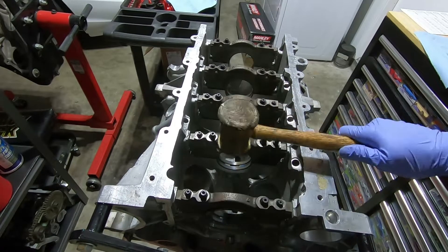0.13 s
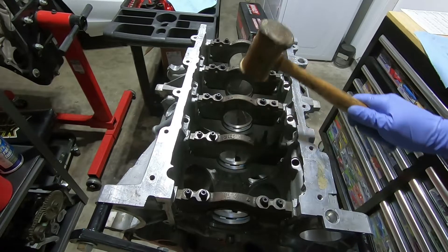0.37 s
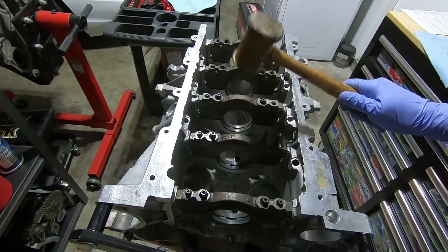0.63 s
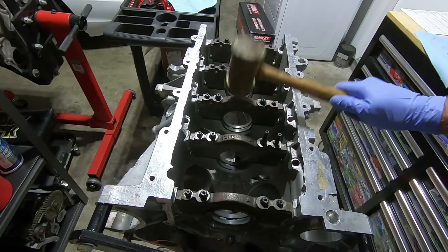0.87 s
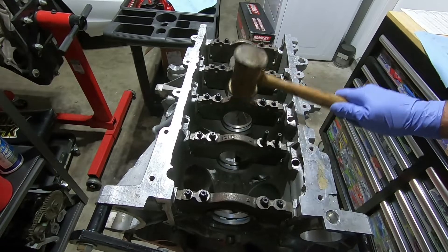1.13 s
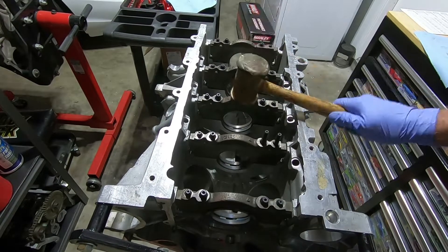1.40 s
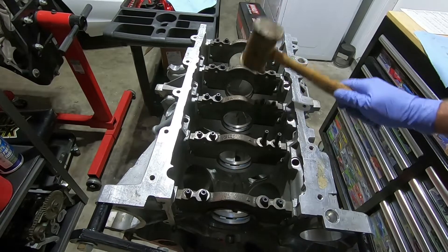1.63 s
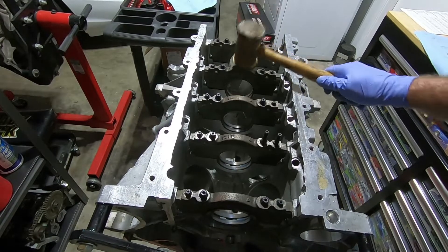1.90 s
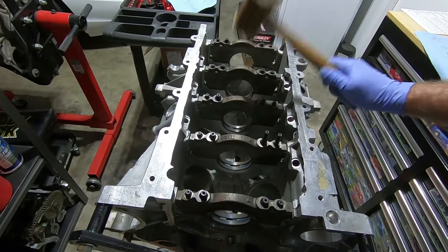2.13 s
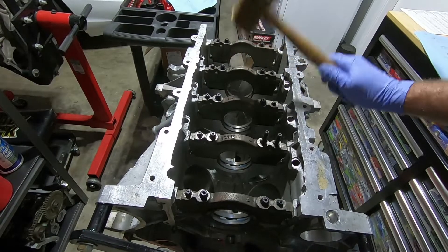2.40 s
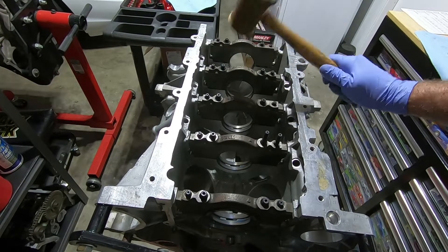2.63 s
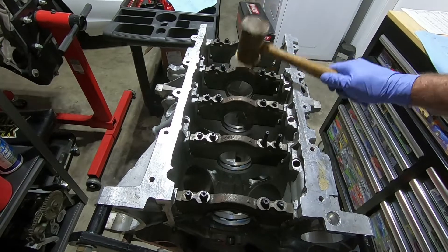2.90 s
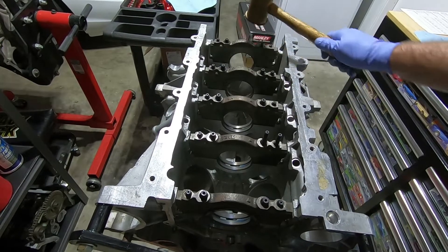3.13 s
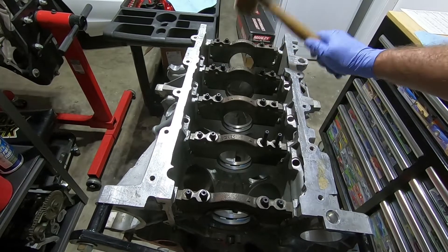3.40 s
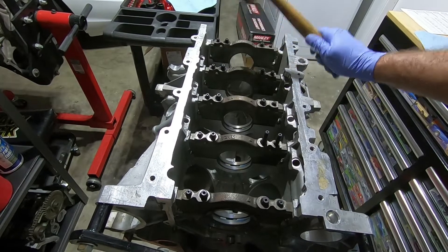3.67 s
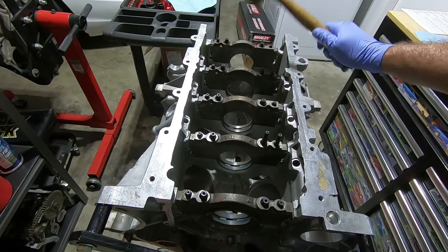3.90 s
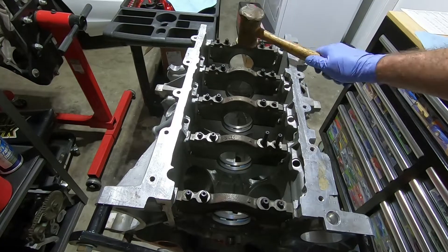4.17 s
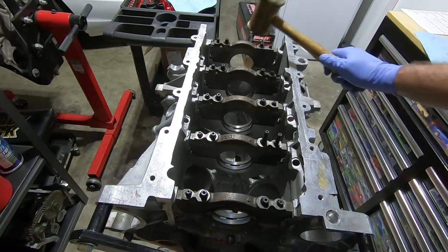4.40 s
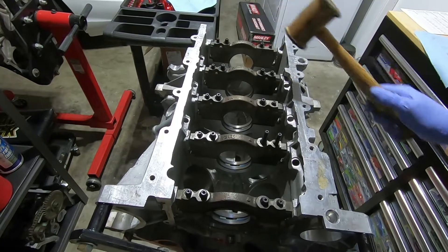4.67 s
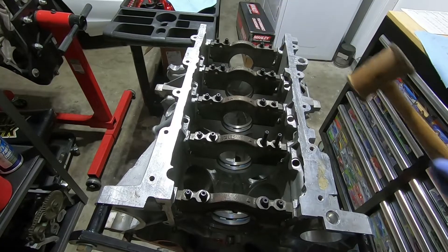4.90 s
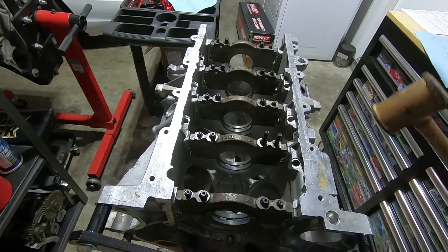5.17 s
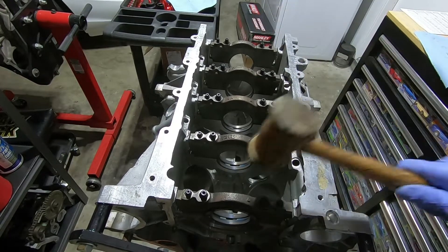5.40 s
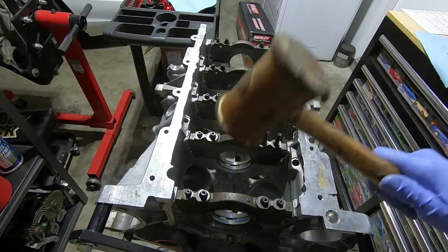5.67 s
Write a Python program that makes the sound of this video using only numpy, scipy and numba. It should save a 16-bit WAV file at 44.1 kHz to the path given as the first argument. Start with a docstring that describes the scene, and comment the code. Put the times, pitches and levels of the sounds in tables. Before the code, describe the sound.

A stereo close-up in a workshop with short, hard reflections. A mallet blow's fading tail opens it, and another knock lands at 0.1 seconds with a light rebound. Three evenly spaced blows follow at 0.8, 1.1 and 1.4, the first clangier, the last with small bounces. In the pause, two very faint thin squeaks glide near 1.8 and 1.9. Another set strikes at 2.2, 2.5 and 2.8, higher in ring, growing louder to a bright, strong clank with a rebound. A last set falls at 3.5, 3.8 and 4.1, starting softer and ending brighter. Each hit is a dry woody knock with gritty metal rattle, brief iron ring and low mount shudder, its tail squeezed by limiting. From about 4.8 only low room hum, soft cloth and shoe rustling and tiny ticks remain, the brightest rub near 5.4, a clearer click near 5.6.

```python
"""A wooden mallet taps bearing caps onto an iron block in a workshop, close to a camera with a limiter.
Each blow sums an air pulse (knock), decaying noise (clatter) and damped modes (ring of the block);
low modes shake the camera mount, and a decaying noise tail convolves blow and ring into the walls' answer.
Clothes and shoes rustle as patchy noise, small contacts tick as short damped tones, two thin tones glide,
and a low room hum of shaped noise lies under everything."""
import sys
import numpy as np
from scipy import signal
from scipy.fft import rfft, irfft, next_fast_len
from scipy.io import wavfile
from scipy.ndimage import uniform_filter1d
from numba import njit

SR = 44100
rng = np.random.default_rng(int(sys.argv[2]) if len(sys.argv) > 2 else 0)


def int16_out(signal):
    """Quantize to a 16-bit WAV file."""
    q = np.round(np.clip(np.atleast_2d(signal).T, -1, 1) * 32767)
    wavfile.write(sys.argv[1], SR, q.astype(np.int16))


def volts_from_db(level):
    """Convert decibel levels to linear amplitude ratios."""
    exponent = np.asarray(level, float) / 20
    return 10 ** exponent


N = 255339  # length in samples
TOUCH_S = 0.0017  # the face pushes the air ahead for this long, then stops hard


def unit(x):
    """Normalisation: scales a signal to an rms of 1."""
    return x / np.sqrt(np.mean(x ** 2) + 1e-20)


def along(points, hz):
    """Logarithmic frequency scale: interpolates (Hz, value) points on a log axis."""
    f, v = np.transpose(points)
    return np.interp(np.log(hz + 1), np.log(f + 1), v)


def filtered(x, response):
    """Linear filtering: multiplies the spectrum of x by a response of frequency."""
    m = next_fast_len(x.shape[-1] + 8192)
    spectrum = rfft(x, m) * response(np.fft.rfftfreq(m, 1 / SR))
    return irfft(spectrum, m)[..., :x.shape[-1]]


def causal(x, db_of):
    """Minimum phase: folding the cepstrum colours x without sound before the attack."""
    def response(hz):
        cepstrum = irfft(np.log(np.maximum(volts_from_db(db_of(hz)), 1e-6)))
        half = len(cepstrum) // 2
        cepstrum[1:half] *= 2
        cepstrum[half + 1:] = 0
        return np.exp(rfft(cepstrum))
    return filtered(x, response)


def pair(noise, alike):
    """Interchannel coherence: mixes two signals into a left and right of the given likeness."""
    def turn(hz):
        return np.arccos(np.clip(along(alike, hz), -1, 1)) / 2
    mid, side = filtered(noise, lambda hz: np.array([np.cos(turn(hz)), np.sin(turn(hz))]))
    return np.array([mid + side, mid - side])


def rush(spectrum, alike, patchy_db):
    """Shaped random noise: stereo, of rms 1, with time-frequency patches of random gain."""
    z = signal.stft(rng.standard_normal((2, N)), nperseg=512)[2]
    field = uniform_filter1d(rng.standard_normal(z.shape[1:]), size=5, axis=0)
    field = uniform_filter1d(field, size=7, axis=1)
    noise = signal.istft(z * volts_from_db(patchy_db * unit(field)), nperseg=512)[1][:, :N]
    coloured = filtered(noise, lambda hz: volts_from_db(along(spectrum, hz)))
    return unit(pair(coloured, alike))


def ringing(hz, t60, db, t, attack, spread_db, drift):
    """Modal synthesis: damped modes at fresh strengths; a slow random walk of phase blurs each line."""
    start_db = (db + spread_db * rng.standard_normal(len(hz)))[:, None]
    level = volts_from_db(start_db - 60 * t / t60[:, None])
    walk = np.cumsum(rng.standard_normal((len(hz), len(t) // 64 + 1)), axis=1)
    walk = walk.repeat(64, axis=1)[:, :len(t)]
    walk = uniform_filter1d(walk, size=128, axis=1)
    modes = level * np.sin(2 * np.pi * hz[:, None] * t + drift * walk)
    return (1 - np.exp(-t / attack)) * np.sum(modes, axis=0)


def mallet():
    """Superposition: all blows and touches at their moments, each on the cap then under the mallet."""
    # Blows. Each row: start in seconds, level in dB, lift in dB near 2.4 kHz,
    # clang (lift in dB near 3.4 kHz), mount shake in dB re the blow ahead of the mount's mode levels.
    blows = [(-.19, -9.5, 6.5, -1.5, -20.5), (0.0963, -12, 8.5, -5.5, -17.5), (.819, -11.5, 10.5, 9, -29),
             (1.1003, -11.5, 9.5, 1.5, -25.5), (1.384, -11.5, 8.5, 0, -25.5), (2.228, -12.5, 12.5, -3, -35),
             (2.5042, -10.5, 10.5, -1, -32.5), (2.77, -8, 14.5, 12.5, -33), (3.499, -15, 9, -0.5, -26.5),
             (3.7845, -12, 8.5, 1, -22.5), (4.086, -10.5, 14, 9.5, -25)]
    # Light touches of the head, most of them rebounds just after a blow.
    # Each row: start in seconds, level in dB.
    touches = [(.134, -20), (1.159, -23), (1.419, -20.5), (1.436, -21), (1.986, -45), (2.557, -25),
               (2.806, -19)]
    # Each cap favours two neighbourhoods of the block's modes. Each row: struck from this time in seconds,
    # first centre in Hz, its lift in dB, second centre in Hz, its lift in dB.
    caps = [(-1, 1442, 16, 1225, 0), (.5, 1474, 13.5, 1850, 12.5), (2.5, 2170, 10, 1820, 4),
            (3, 1410, 11, 1610, 9.5)]
    lead = SR // 4  # room for the blow that falls just before the start
    out = np.zeros((2, lead + N + SR))
    light = [(s, db, 3, 0, -38, -6) for s, db in touches]  # last column: echo in dB
    for s, db, *tone in [*blows, *light]:
        cap = [c for c in caps if c[0] < s][-1]
        sound = blow([cap[1:3], cap[3:]], db, *tone)
        out[:, lead + round(s * SR):][:, :sound.shape[1]] += sound
    return out[:, lead:lead + N]


def blow(favoured, db, mid_db, clang_db, shake_db, echo_db=0):
    """Impact excitation: one blow drives air, contact, block, mount and walls together."""
    # Spectrum of the clatter. Each row: frequency in Hz, relative level in dB per hertz.
    clatter_spectrum = [(88, -27.5), (150, -18.5), (361, -13.5), (745, -18), (1480, -10), (2450, -22.5),
                        (4320, -16), (5460, -19.5), (8730, -35.5), (11500, -53), (13700, -50), (16000, -60)]
    t = np.arange(SR * 7 // 10) / SR
    after = np.maximum(t - TOUCH_S, 0)
    soft_db = 0.68 * max(-21.5 - db, 0)  # a light touch sounds duller
    edge_db = 1.165 * clang_db - 4.5  # a clangy blow is also lifted near 4.7 kHz
    lift = [(550, soft_db), (1700, 0.02), (2400, mid_db), (3400, clang_db),
            (4700, edge_db), (6500, 0.84 * edge_db)]

    def colour(hz):
        return along(clatter_spectrum, hz) + along(lift, hz)

    grit = clatter(after, colour)
    ring = volts_from_db(0.5 - .3 * soft_db) * block_ring(after, favoured, lift)
    burst = causal(1. * (t == 0), colour)  # the walls receive the blow from all sides at once
    echo = volts_from_db(echo_db) * walls(volts_from_db(26) * burst / np.linalg.norm(burst) + volts_from_db(6.5) * ring)
    shake = mount_shake(t, shake_db)
    width = volts_from_db(-9.5) * grit[1] * [[1], [-1]]
    return volts_from_db(db) * (knock(t, after, soft_db) + grit[0] + ring + width + echo + shake)


def knock(t, after, soft_db):
    """Air displacement: a growing push ends in a damped swing of opposite sign when the face stops."""
    swing = -np.exp(-after / .0006) * np.cos(2 * np.pi * 1200 * after)
    push = np.where(t < TOUCH_S, .25 * (t / TOUCH_S) ** 2, swing)
    body = [(30, -33.5), (200, 9.5), (2500, 0.5), (7000, -2.0), (11000, -24.5), (16000, -48)]  # Hz, dB
    dull = [(550, 0.51 * soft_db), (1500, -.2 * soft_db), (6000, -1.1 * soft_db)]
    return volts_from_db(2.5) * causal(push, lambda hz: along(body, hz) + along(dull, hz))


def clatter(after, colour):
    """Random micro-impacts: the cap rattles on its seat, as two coloured noises that die away."""
    fade = volts_from_db(-60 * after / 0.026) * (after > 0)  # t60 of 26 ms
    grit = causal(rng.standard_normal((2, len(after))) * fade, colour)
    return grit / np.linalg.norm(grit[0]) * volts_from_db(14.5)


def block_ring(after, favoured, lift):
    """Modal resonance: cap and block ring, with a lift for the modes that the struck cap favours."""
    # Modes of cap and block. Each row: frequency in Hz, t60 in seconds, base level in dB re the blow.
    block_modes = [(436.5, 0.12, -25.5), (543, 0.12, -26), (960, 0.092, -22.5), (1233, 0.037, -14.5),
                   (1401.5, 0.1, -16.5), (1433, 0.18, -27.5), (1470, 0.15, -24), (1615, 0.11, -19.5),
                   (1821, 0.11, -20.5), (1870, 1.1, -53), (1910, 0.35, -28), (2100, 0.1, -23.5),
                   (2257, .07, -28), (2650, 0.053, -25), (2929, 0.092, -29), (3060, 0.14, -27),
                   (3190, .05, -30), (3593, .07, -31), (3857, 0.17, -24.5), (3940, 0.094, -27),
                   (4560, 0.095, -27.5), (5002, .07, -48), (5230, 0.056, -40)]
    hz, t60, mode_db = np.transpose(block_modes)
    for near_hz, up_db in favoured:
        # width of a neighbourhood: 0.018 of its frequency
        mode_db = mode_db + up_db * np.exp(-(np.log(hz / near_hz) / 0.018) ** 2)
    drift = (0.45 / (1 + t60 / 0.39))[:, None]  # long rings are the steadier
    mode_db = mode_db + 0.87 * along(lift, hz)
    return ringing(hz, t60, mode_db, after, attack=0.0015, spread_db=2.0, drift=drift)


def mount_shake(t, shake_db):
    """Structure-borne vibration: low damped modes, in opposite senses at the two ports."""
    # Modes of the camera mount. Each row: frequency in Hz, t60 in seconds ahead of the common fade,
    # relative level in dB.
    mount_modes = [(50, .3, -3), (60.4, 0.43, 11), (74.5, 0.75, 2), (92.34, 0.5, 18.5), (100.5, 0.33, 11.5),
                   (104.2, 0.34, 9.5), (142, 0.29, 8.5), (273, 0.33, 3)]
    sway = ringing(*np.transpose(mount_modes), t, attack=.012, spread_db=1.5, drift=.05)
    fade = volts_from_db(shake_db - 60 * t ** 2)  # the shake dies away faster and faster with time
    return fade * sway * [[1], [-.6]]


def walls(x):
    """Reverberation: convolves x with a fresh noise tail in which each frequency dies at its own speed."""
    # Colour of the walls' answer. Each row: frequency in Hz, relative level in dB.
    echo_colour = [(100, -5.5), (400, -4.5), (1000, -2.5), (1500, -4), (3000, -6), (6000, -6.5),
                   (10000, 12.5), (12000, 7), (14000, 12), (16000, -9.5)]
    # Decay of the walls' answer. Each row: frequency in Hz, t60 in seconds.
    wall_decay = [(100, 0.32), (300, 0.4), (1000, 0.49), (3000, 0.51), (6000, 0.43), (10000, 0.3),
                  (15000, 0.22)]
    # Coherence of the walls' answer. Each row: frequency in Hz, left-right likeness from 0 to 1.
    echo_alike = [(200, 0.9), (1400, 0.3), (3000, 0.68), (7000, 0.032), (15000, 0)]
    hz, t, z = signal.stft(rng.standard_normal((2, SR * 3 // 4)), SR, nperseg=256)
    level_db = along(echo_colour, hz)[:, None] - 60 * t / along(wall_decay, hz)[:, None]
    tail = pair(signal.istft(z * volts_from_db(level_db), SR, nperseg=256)[1], echo_alike)
    tail = tail * (1 - np.exp(-np.arange(tail.shape[1]) / SR / 0.013))  # the first walls are metres away
    return signal.fftconvolve(x[None], tail / np.linalg.norm(tail[0]), axes=1)[:, :len(x)]


def ticks():
    """Impulsive contact: short damped tones with noise in them."""
    # Small contacts. Each row: start in seconds, level in dB, frequency in Hz.
    contacts = [(4.82, -63, 3000), (5.02, -60, 8740), (5.57, -46.5, 3100), (5.779, -55, 708)]
    out, t = np.zeros(N + SR), np.arange(SR // 20) / SR
    for s, db, hz in contacts:
        tone = np.sin(2 * np.pi * hz * t) + 0.49 * rng.standard_normal(len(t))
        out[round(s * SR):][:len(t)] += volts_from_db(db - 60 * t / 0.004) * tone  # t60 of 4 ms
    return out[:N]


def rustle():
    """Friction noise: cloth and soles rub in three ranges, swelling and fading, a little to the right."""
    # Rubs of cloth and shoes. Each row: peak time in seconds, rise (by 20 dB) in seconds,
    # t60 of the fall in seconds, level in dB, tilt in dB per range towards the bright.
    rubs = [(.558, .02, 0.73, -71.5, -4), (4.77, .03, 0.39, -89, -7), (4.94, .06, 1.17, -74, 1.5),
            (5.2, 0.31, 2.4, -69.5, -2), (5.381, 0.018, 0.5, -60, 8.5), (5.639, 0.14, 0.4, -63.5, 6.5),
            (5.79, 0.019, .2, -65, -9)]
    # Spectra of the low, middle and bright range. Each row: frequency in Hz, relative level in dB per hertz.
    cloth_spectra = [
        [(350, -22.5), (600, -2.5), (800, 3), (1050, -5), (1400, -25.5)],
        [(800, -28.5), (1150, 1), (1600, 3), (2100, -4.5), (2800, -25)],
        [(1290, -40), (2200, -5), (3340, -3.5), (4080, -7.5), (4570, -6), (5200, -12), (8350, -11.5),
         (15000, -47.5)],
    ]
    hold_s, middle_db = .025, 2  # a rub stays at its peak for a moment; its middle range stands out
    t, ranges = np.arange(N) / SR, np.array([[-1], [0], [1]])
    power = 0
    for s, rise, t60, db, tilt_db in rubs:
        fall_db = 60 * np.maximum(t - s - hold_s, 0) / t60
        below_db = np.where(t < s, 20 * (s - t) / rise, fall_db)
        power = power + volts_from_db(db + tilt_db * ranges - below_db + middle_db * (ranges == 0)) ** 2
    alike = [(500, 0.0091), (3000, 0.56), (7000, 0)]  # Hz, left-right likeness
    rub = sum(level * rush(spectrum, alike, patchy_db=3.0)
              for level, spectrum in zip(np.sqrt(power), cloth_spectra))
    return rub * volts_from_db([[-1.2], [1.2]])


def squeak():
    """Frequency modulation: two faint, thin tones glide as their phase grows quadratically."""
    # Squeaks. Each row: start in seconds, length in seconds, start frequency in Hz,
    # glide in Hz per second, level in dB.
    glides = [(1.76, .085, 4410, 2600, -86), (1.915, .07, 4655, -6100, -84)]
    t, out = np.arange(N) / SR, 0
    for s, length, hz, glide, db in glides:
        u = np.clip(t - s, 0, length)
        swell = np.sqrt(2 * np.abs(np.sin(np.pi * u / length)))
        out = out + volts_from_db(db) * swell * np.sin(2 * np.pi * (hz + glide * u / 2) * u)
    return out


def hum():
    """Ambient noise: the quiet room as low rumble with a little hiss."""
    # Spectrum of the room. Each row: frequency in Hz, relative level in dB per hertz.
    hum_spectrum = [(15, -46.5), (25, 0), (91, -27), (149, 1.5), (256, -4.5), (386, -8.5), (527, -12.5),
                    (800, -17), (2480, -19.5), (3210, -29), (5120, -29), (12000, -41), (15600, -81.5),
                    (22000, -120)]
    # Level of the background as heard: low after the blows, rising again towards the end.
    # Each row: time in seconds, level in dB.
    heard_level = [(0, -72), (1.9, -71.5), (3.15, -79.5), (3.5, -74.5), (4.55, -73.5), (4.8, -70),
                   (4.9, -72), (5.5, -64.5), (5.79, -74)]
    s, db = np.transpose(heard_level)
    noise = rush(hum_spectrum, [(100, .55), (300, .2), (8000, 0)], patchy_db=.4)
    return volts_from_db(np.interp(np.arange(N) / SR, s, db)) * noise


def scene():
    """Superposition: the sounds of mallet, worker and room add up."""
    return mallet() + ticks() + rustle() + squeak() + hum()


@njit
def follow(cut_db, fall, rise):
    """First-order lag: a gain in dB that falls and recovers with two time constants."""
    out, g = np.zeros_like(cut_db), 0.
    for i in range(len(out)):
        g += (cut_db[i] - g) * (fall if cut_db[i] < g else rise)
        out[i] = g
    return out


def top_cut(x):
    """Nothing passes above the cut-off."""
    return signal.sosfilt(signal.butter(12, 16470, fs=SR, output="sos"), x)


def record(dry):
    """Gain control: a limiter too slow for the knock holds the tail until it sinks under the threshold."""
    # Response of the microphone. Each row: frequency in Hz, gain in dB.
    mic_response = [(20, 7.5), (9000, 6), (11000, 2.5), (13000, -4.5), (15500, -10), (17000, -62)]
    step = 1 / (0.011 * SR)  # power averaged over 11 ms
    power = signal.lfilter([step], [1, step - 1], np.mean(dry ** 2, axis=0))
    cut_db = -.9 * np.maximum(10 * np.log10(power + 1e-12) + 31, 0)  # threshold -31 dB
    gain_db = follow(cut_db, 1 / (0.013 * SR), 1 / (0.009 * SR))  # time constants: fall 13 ms, rise 9 ms
    held = filtered(dry * volts_from_db(gain_db), lambda hz: volts_from_db(along(mic_response, hz)))
    clipped = held / (1 + np.abs(held / .92) ** 6) ** (1 / 6)  # rounded clipping at 0.92
    roll_off = [(11000, 0), (14000, -4), (16500, -16)]  # of the converter: Hz, dB
    finished = filtered(clipped, lambda hz: volts_from_db(along(roll_off, hz)))
    return top_cut(finished)


dry = scene()
out = record(dry)
int16_out(out)
```